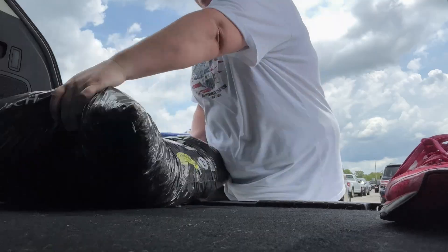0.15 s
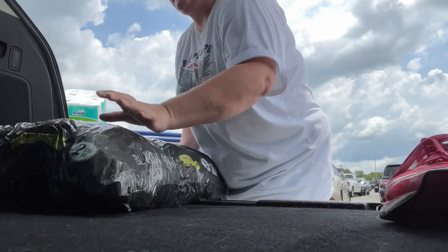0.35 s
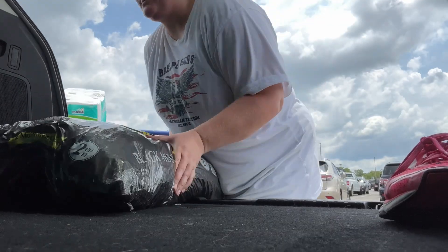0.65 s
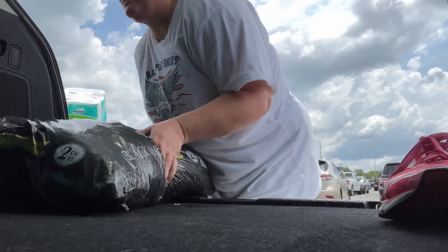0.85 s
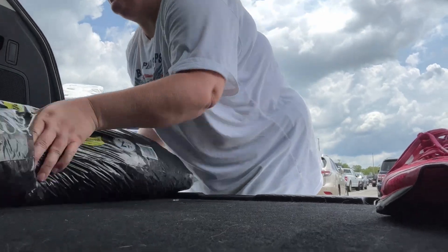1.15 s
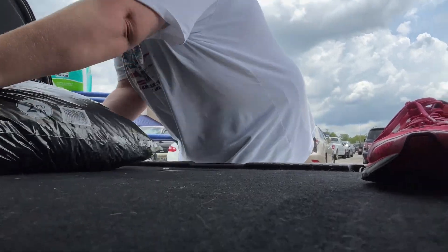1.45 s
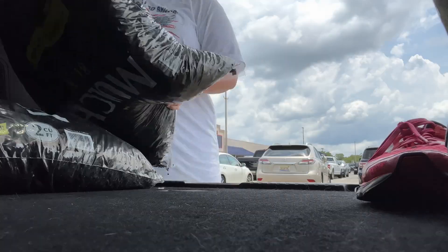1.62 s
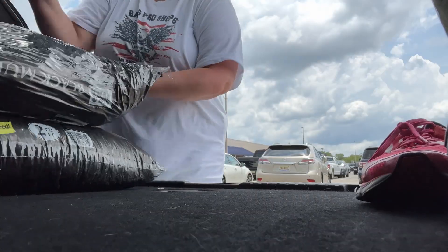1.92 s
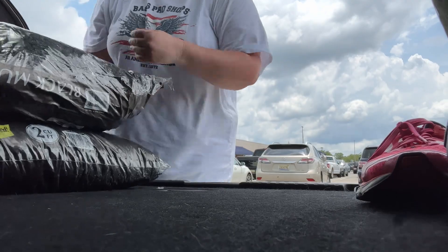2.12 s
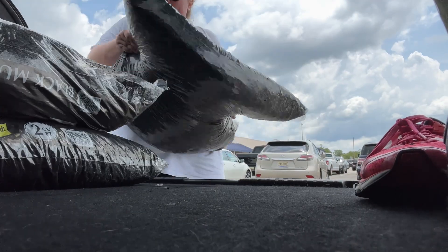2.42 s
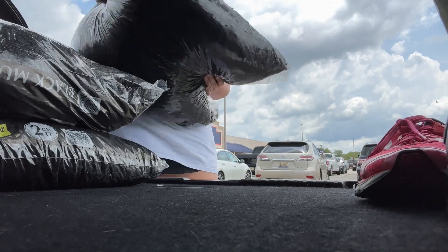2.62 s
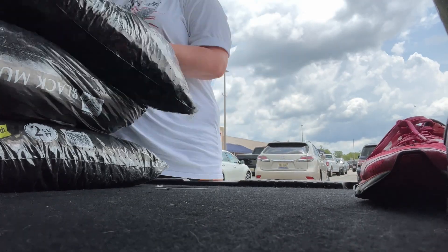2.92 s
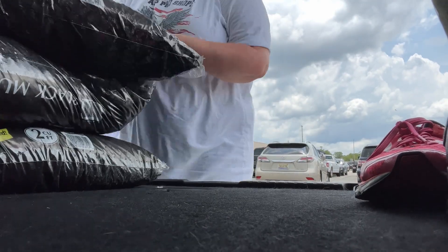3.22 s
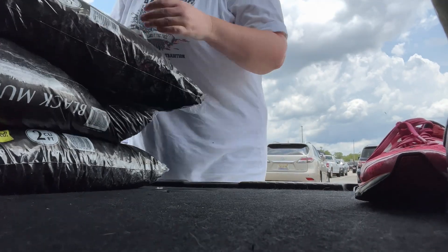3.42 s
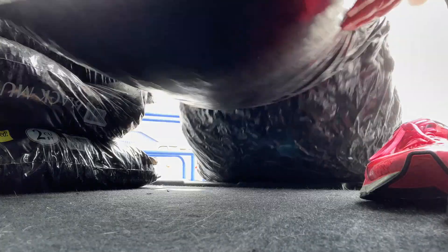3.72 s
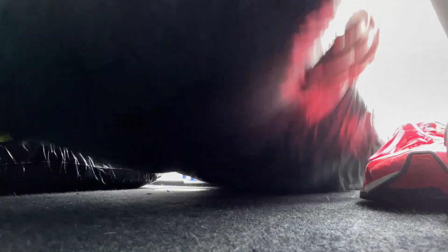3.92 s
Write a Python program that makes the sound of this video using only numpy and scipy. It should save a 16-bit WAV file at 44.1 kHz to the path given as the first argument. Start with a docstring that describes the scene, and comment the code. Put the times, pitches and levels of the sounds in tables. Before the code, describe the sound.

A heavy plastic sack of mulch lands close by in a car's open cargo bay with a crackle and a deep thump. It is pushed along the carpet with a rubbing hiss, then more sacks drop in three further bursts of crinkling film, low crunching and dull thuds. Parking lot engines rumble underneath, with a faint hiss of far traffic. The microphone is inside the bay, near the sacks.

```python
"""A heavy plastic sack of mulch crinkles and thumps into the open cargo bay of a car, close by.
Sacks are dragged, lifted and dropped again. Each impact excites a damped vibration of the floor;
folds of film snap, the mulch shifts in tiny slips, and friction on the carpet rubs and hisses.
Behind it all, engines rumble across the parking lot over a thin hiss of far traffic."""
import sys
import numpy as np
from scipy import signal
from scipy.fft import rfft, irfft, next_fast_len
from scipy.io import wavfile
from scipy.ndimage import uniform_filter1d, map_coordinates

SR = 44100
rng = np.random.default_rng(int(sys.argv[2]) if len(sys.argv) > 2 else 0)


def bounce(signal):
    """Save signal as a 16-bit WAV file at the path given by the first command-line argument."""
    frames = np.transpose(np.atleast_2d(signal))
    limited = np.clip(frames, -1, 1)
    pcm = np.round(limited * 32767).astype(np.int16)
    wavfile.write(sys.argv[1], SR, pcm)


N = 178781

# Weight landing or shifting: (time [s], level [dB], decay time T60 [s])
THUMPS = [(.118, -13.5, 0.18), (0.227, 5.5, 0.084), (0.257, 1.5, 0.076), (.518, -10, 0.13),
          (1.948, 0.5, 0.23), (2.034, 0.5, 0.082), (2.389, -9, 0.26), (2.773, -7, 0.11), (2.948, -10, 0.37),
          (3.175, 4, 0.19), (3.778, -6, .13), (3.931, 10, 0.089), (3.971, 7, 0.053)]
def floor_thumps():
    """Impact excitation: the floor rings at one low pitch, starting higher under a harder blow."""
    floor_hz, sag_per_db = 67.5, 0.28
    rows = [(s, db, floor_hz, t60, 1 + sag_per_db * db) for s, db, t60 in THUMPS]
    return damped_rings(rows, settle_s=0.0045, attack_s=0.0072)

# Slaps on a sack: (time [s], level [dB], first pitch [Hz], settled pitch [Hz])
SLAPS = [(.0475, -9.5, 830, 674), (0.1393, -5, 1100, 287), (.549, -28, 1060, 510), (1.6975, -13, 1330, 253),
         (2.1282, -4, 860, 225), (2.905, -22, 970, 453), (3.062, 2, 554, 268), (3.6145, -12, 900, 590),
         (3.6315, -5.5, 1160, 510), (3.647, -7, 1020, 330)]
def sack_slaps():
    """Heavy damping: a struck sack rings for only a few cycles as its pitch falls."""
    t60 = 0.021
    rows = [(s, db, hz, t60, first_hz / hz - 1) for s, db, first_hz, hz in SLAPS]
    return damped_rings(rows, settle_s=0.002, attack_s=0.0011)

# Spectrum of the film: (frequency [Hz], relative level [dB])
FILM = [(1760, -1.5), (3000, -14.5), (4300, -1.5), (6200, -2), (8000, -6), (10000, -3.5), (13200, -4.5),
        (14200, -14.5), (14700, -57), (15700, -58)]
def film_crinkle():
    """Buckling: thousands of tiny creases give way, each a bright click."""
    clicks = slips(count=2500, spread_db=4, life_s=0.0005, share=0.26)
    return noise_pair(FILM, flicker_db=4, spikes=clicks, ring_db=6)

# Folds of film: (time [s], bright relative level [dB], dull relative level [dB])
SNAPS = [(0.0534, -35, -30), (0.094, -16, -32), (0.1393, -30, -17), (.4574, -52, -51), (.511, -36, -37),
         (0.551, -37, -27), (.724, -33, -38), (.7685, -38.5, -41), (.7796, -29.5, -43), (.7966, -32, -40),
         (0.8407, -25, -43), (1.4441, -31, -18.5), (1.555, -27.5, -46), (1.629, -35, -47),
         (1.6651, -36, -29), (1.697, -26, -21), (1.7196, -20.5, -43), (1.8916, -32, -16), (1.986, -15, -31),
         (2.0358, -13, -19.5), (2.189, -30, -36), (2.275, -46, -36), (2.4447, -38, -30.5),
         (2.485, -36.5, -32), (2.526, -35, -50), (2.585, -24, -33), (2.687, -33, -49), (2.7686, -37, -49),
         (2.8677, -23.5, -47), (2.886, -25.5, -41), (2.9127, -20.5, -20), (3.055, -28, -13),
         (3.334, -29.5, -23.5), (3.3886, -29, -31.5), (3.4456, -30, -28.5), (3.599, -37, -54),
         (3.6163, -35, -29), (3.647, -22, -36)]
def film_snaps():
    """Snap-through: a fold lets go in a burst, part bright and part dull; two weaker folds follow."""
    t60, follow_within_s = .016, .014
    bursts, t = np.zeros((2, N + SR)), np.arange(SR // 8) / SR
    for s, bright_db, dull_db in SNAPS:
        delays = [0, *follow_within_s * rng.random(2)]
        for delay, fold_db in zip(delays, [-10, -15, -15]):
            decay = amp(fold_db - 60 * t / t60)
            bursts[:, round((s + delay) * SR):][:, :len(t)] += amp([[bright_db], [dull_db]]) * decay
    bright, dull = bursts[:, :N]
    return bright * noise_pair(FILM, flicker_db=6) + dull * noise_pair(RUB, flicker_db=6)

# Spectrum of the mulch: (frequency [Hz], relative level [dB])
MULCH = [(90, -2), (150, 0.5), (260, -1), (400, -5.5), (490, -6), (670, -4.5), (900, -11), (2000, -24),
         (2600, -65)]
def mulch_shift():
    """Granular flow: many small slips add up to a low crunch."""
    grains = slips(count=1200, spread_db=4.5, life_s=0.014, share=1.0)
    return noise_pair(MULCH, flicker_db=1, spikes=grains, ring_db=6)

# Spectrum of a rubbed sack: (frequency [Hz], relative level [dB])
RUB = [(590, -8), (1000, -2), (1720, -6.5), (1990, -4.5), (2610, -5.5), (3970, -10), (6000, -17.5),
       (7800, -34), (13200, -120)]
def carpet_rub():
    """Stick-slip friction: the sack catches on the carpet and lets go."""
    catches = slips(count=2000, spread_db=6, life_s=0.0012, share=0.38)
    return noise_pair(RUB, flicker_db=2, spikes=catches, ring_db=6)

# The long push: (time [s], level [dB])
DRAG = [(.7, -70), (.8, -58), (.9, -42.5), (1.05, -40.5), (1.3, -36.5), (1.42, -41), (1.5, -55),
        (1.55, -80)]
def carpet_drag():
    """Sliding friction: a sack pushed along the carpet hisses smoothly."""
    return amp(curves(DRAG)[0]) * noise_pair(RUB, flicker_db=3, ring_db=4)

# Brief narrow bands of noise: (time [s], duration [s], pitch [Hz], bandwidth [Hz], level [dB])
NOISE_BANDS = [ (.240, .047, 350, 150, -25.5), (.915, .15, 1000, 80, -40), (1.260, .16, 650, 120, -38),
               (1.300, .1, 2000, 150, -39), (1.930, .07, 300, 120, -21), (2.040, .14, 4600, 150, -52),
               (2.200, .1, 1750, 100, -52), (3.030, .1, 400, 80, -20), (3.040, .046, 700, 200, -21),
               (3.100, .08, 300, 121, -21.5)]
def noise_bands():
    """Random modulation: narrow bands of noise swell and fade, from low hums to faint whistles."""
    out, t = np.zeros((2, N + SR)), np.arange(SR // 4) / SR
    for s, length, hz, width_hz, db in NOISE_BANDS:
        swell = np.sin(np.pi * np.clip(t / length, 0, 1))
        shake = np.array([wobble(width_hz, len(t)) + 1j * wobble(width_hz, len(t)) for _ in range(2)])
        band = np.real(shake * np.exp(2j * np.pi * hz * t))
        out[:, round(s * SR):][:, :len(t)] += amp(db) * swell * band
    return out[:, :N]

# A table per bout (drop, slide, drop, lift, drop, drop): (time [s], mulch level [dB], film level [dB])
BOUT_LEVELS = [
    [(0, -35, -42), (.04, -35, -43), (.055, -25, -38), (.11, -27, -40.5), (.22, -29.5, -38.5),
     (.238, -23, -33), (.268, -20.5, -31.5), (.296, -30.5, -36.5), (.306, -32.5, -49), (.412, -44.5, -61.5),
     (.53, -44, -60)],
    [(.546, -30, -45), (.59, -36, -52), (.765, -34.5, -53.5), (.83, -32, -45), (.897, -33.5, -48),
     (1.26, -31.5, -48), (1.335, -26, -41), (1.437, -34, -50), (1.5, -38.5, -49.5), (1.6, -46.5, -56)],
    [(1.64, -43, -50.5), (1.665, -39, -45), (1.702, -30.5, -33.5), (1.72, -36.5, -43.5), (1.842, -25, -40),
     (1.885, -21, -35.5), (1.914, -14, -24.5), (1.945, -14.5, -25.5), (2.025, -33.5, -44.5),
     (2.1, -45, -46), (2.134, -34.5, -48.5), (2.16, -34, -44), (2.214, -40.5, -54.5), (2.36, -44.5, -62)],
    [(2.43, -48, -62), (2.6, -43, -51), (2.646, -42, -48.5), (2.75, -39, -50.5), (2.775, -46, -46.5),
     (2.83, -44, -57.5), (2.878, -50, -54)],
    [(2.887, -41, -41), (2.911, -22, -38.5), (3.025, -23.5, -33), (3.063, -13.5, -23.5), (3.159, -19, -34),
     (3.225, -28.5, -36), (3.272, -36, -47.5), (3.342, -32, -51.5), (3.46, -42, -53.5), (3.6, -50.5, -60)],
    [(3.614, -27, -42), (3.65, -22, -35), (3.662, -34, -38), (3.76, -25.5, -36.5), (3.814, -25.5, -33.5),
     (3.862, -25.5, -38.5), (3.928, -21.5, -31.5), (3.984, -18.5, -34.5), (4.05, -37.5, -43)],
]
# A row per bout: (rub above the mean of mulch and film [dB], left minus right [dB])
BOUT_BALANCE = [(-4, 1.5), (-2.5, -1.5), (-4, 4), (-5, -3), (-4.5, -1), (-5.5, -1.5)]
def handling():
    """Common modulation: one uneven grip shakes mulch, rub and film. Returns the rustle and its pan."""
    rows = [(s, mulch, (mulch + film) / 2 + rub, film, pan)
            for bout, (rub, pan) in zip(BOUT_LEVELS, BOUT_BALANCE) for s, mulch, film in bout]
    mulch_db, rub_db, film_db, pan_db = curves(rows)
    jerks = wobble(29.99)
    sack = amp(mulch_db + 1.7 * jerks) * mulch_shift() + carpet_drag()
    sack += amp(rub_db + 1.04 * jerks) * carpet_rub()
    sack += amp(film_db + 1.6 * jerks) * film_crinkle()
    return sack + noise_bands() + film_snaps(), pan_db

# Rumble reaching the bay: (time [s], level [dB])
ENGINE_LEVEL = [(0, -26), (.5, -27), (1.2, -21.5), (1.8, -24), (2.6, -24.5), (3.4, -24.5), (4.05, -23.5)]
# Its spectrum: (frequency [Hz], relative level [dB])
ENGINE_SPECTRUM = [(15, -40), (25, -34), (38, -17.5), (52, -7), (66, -1.5), (85, -7.5), (135, -10),
                   (190, -16), (300, -24.5), (520, -36), (900, -47.5), (1300, -103)]
def engine_rumble():
    """Forced vibration: engines set the bay booming in uneven lumps."""
    lumps = amp(1.17 * wobble(12))
    return amp(curves(ENGINE_LEVEL)[0]) * unit(lumps * noise_pair(ENGINE_SPECTRUM, flicker_db=4))

# Spectrum of far traffic: (frequency [Hz], relative level [dB])
TRAFFIC = [(250, -11), (400, -14), (800, -3.5), (2000, -17), (6500, -23), (8000, -82), (11000, -21),
           (13500, -64), (14300, -70)]
def traffic_hiss():
    """Broadband noise: far traffic blends into a thin, steady hiss."""
    return amp(-53) * noise_pair(TRAFFIC, flicker_db=2)

def damped_rings(rows, settle_s, attack_s):
    """Damped oscillation: the pitch glides to its resting value as the soft weight spreads."""
    out, t = np.zeros(N + SR), np.arange(SR // 2) / SR
    for s, db, hz, t60, sag in rows:
        cycles = hz * (t + sag * settle_s * (1 - np.exp(-t / settle_s)))
        envelope = amp(db - 60 * t / t60) * (1 - np.exp(-t / attack_s)) ** 2
        out[round(s * SR):][:len(t)] += np.sin(2 * np.pi * cycles) * envelope
    return out[:N]

def slips(count, spread_db, life_s, share):
    """Shot noise: an envelope of sudden, uneven starts that die exponentially, on a steady base."""
    when, size = rng.random((count, 2)).T
    starts = np.bincount((when * N).astype(int), amp(-spread_db * np.log(size + .03)), N)
    return 1 + share * unit(signal.lfilter([1], [1, -np.exp(-1 / (life_s * SR))], starts))

def noise_pair(spectrum, flicker_db, spikes=1, ring_db=0):
    """Spectral shaping: two uncorrelated noises of rms 1 share a colour and an envelope of spikes."""
    pair = rng.standard_normal((2, N))
    if ring_db:  # narrow passing resonances
        pair = patches(pair, ring_db, window=1024, bins=2, frames=7)
    pair = patches(spikes * pair, flicker_db, window=256, bins=5, frames=8)
    return unit(filtered(pair, lambda hz: amp(along(spectrum, hz))))

def patches(pair, depth_db, window, bins, frames):
    """Random modulation: patches of time and frequency rise or fall by up to depth_db."""
    spectra = signal.stft(pair, nperseg=window)[2]
    field = rng.standard_normal(spectra.shape[1:])
    field = uniform_filter1d(uniform_filter1d(field, bins, axis=0), frames, axis=1)
    return signal.istft(spectra * amp(depth_db * np.tanh(unit(field) / 2)), nperseg=window)[1][:, :N]

def wobble(rate, count=N):
    """Spline interpolation through rate random knots a second."""
    knots = rng.standard_normal(int(N * rate / SR) + 4)
    return map_coordinates(knots, [np.arange(count) * rate / SR])

def filtered(x, response):
    """Linear filtering: the spectrum times a complex response."""
    size = next_fast_len(N + SR // 2)
    return irfft(rfft(x, size) * response(np.fft.rfftfreq(size, 1 / SR)), size)[..., :N]

def curves(rows):
    """Linear interpolation in time of each later column."""
    s, *columns = np.transpose(rows)
    return [np.interp(np.arange(N) / SR, s, column) for column in columns]

def along(points, hz):
    """Interpolation on a log frequency axis."""
    knots_hz, values = np.transpose(points)
    return np.interp(np.log(hz + 1), np.log(knots_hz + 1), values)

def amp(db):
    """Decibels to amplitude."""
    return 10 ** (np.asarray(db) / 20)

def unit(x):
    """Normalisation to rms 1."""
    return x / np.sqrt(np.mean(x ** 2) + 1e-20)

# Stereo width, narrow in the bass and one top band: (frequency [Hz], side minus mid [dB])
WIDTH = [(30, -15), (70, -22), (130, -16.5), (250, -9), (500, -4), (1200, 0.5), (3000, -1.5), (7000, 2),
         (10000, 3.5), (10900, -55), (12700, -40), (13200, -9), (14200, 16), (15000, 9)]
# Side power that follows the mid: (frequency [Hz], share [0-1])
COHERENCE = [(60, .4), (200, .4), (600, .3), (1500, .28), (4000, .17), (10000, .1)]
def scene():
    """Superposition at two microphone ports, the left reached a little sooner."""
    rustle, pan_db = handling()
    hits = floor_thumps() + sack_slaps()
    mid, diffuse = rustle + engine_rumble() + traffic_hiss()
    mid = mid + hits
    width = lambda hz: amp(along(WIDTH, hz))
    coherence = lambda hz: along(COHERENCE, hz)
    # the lag between the ports puts the side about a quarter cycle ahead of the mid
    side = filtered(mid, lambda hz: width(hz) * np.sqrt(coherence(hz)) * np.exp(1.75j))
    side += filtered(diffuse, lambda hz: width(hz) * np.sqrt(1 - coherence(hz)))
    lean = np.tanh(np.log(amp(pan_db)) / 2)  # side-to-mid ratio for a left-right level gap
    side += filtered(lean * rustle[0], lambda hz: np.minimum(1, width(hz))) + lean * hits
    return np.array([mid + side, mid - side])

def record(dry):
    """Saturation and band limiting: peaks round off near full scale and the top treble is cut."""
    ceiling, top_hz = .98, 15700
    soft = dry / (1 + np.abs(dry / ceiling) ** 6) ** (1 / 6)
    return filtered(soft, lambda hz: hz < top_hz)

dry = scene()
out = record(dry)
bounce(out)
```